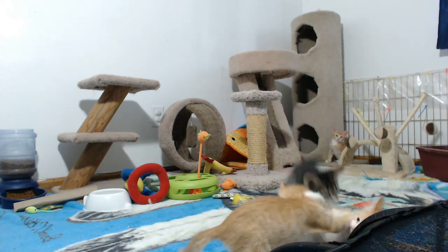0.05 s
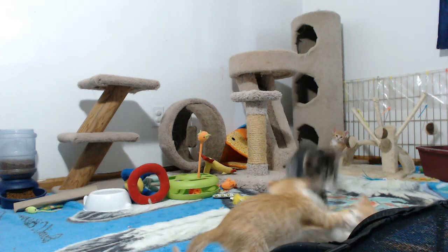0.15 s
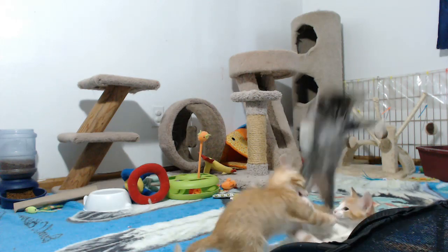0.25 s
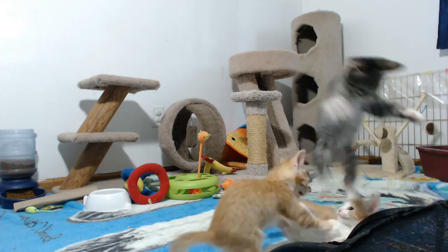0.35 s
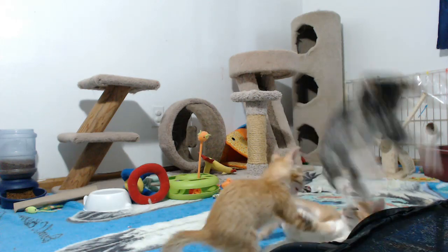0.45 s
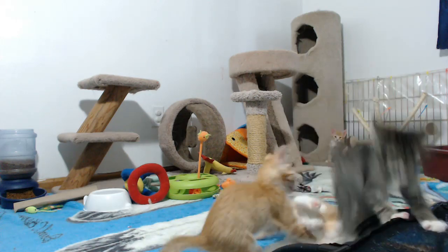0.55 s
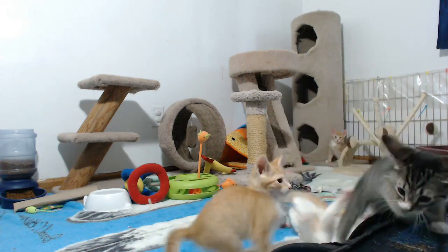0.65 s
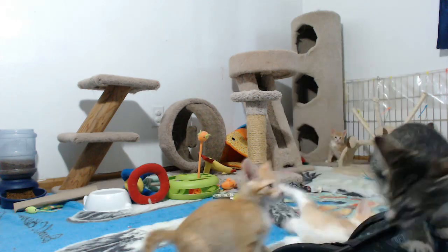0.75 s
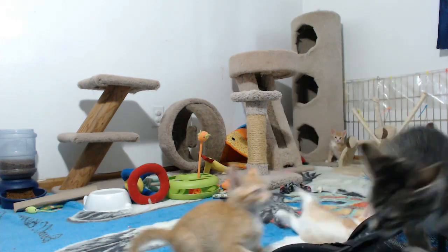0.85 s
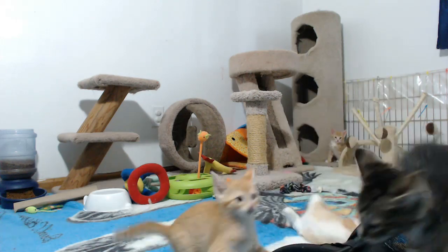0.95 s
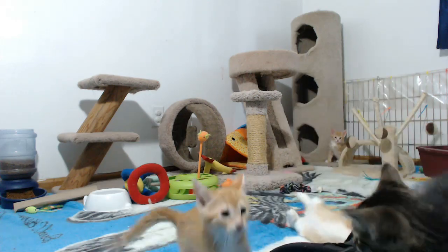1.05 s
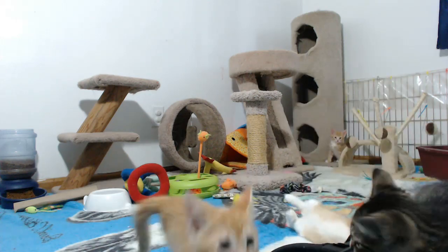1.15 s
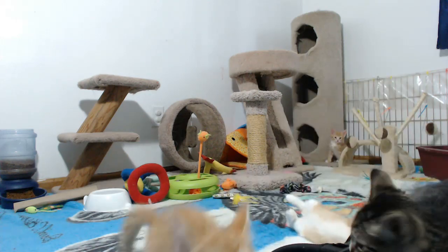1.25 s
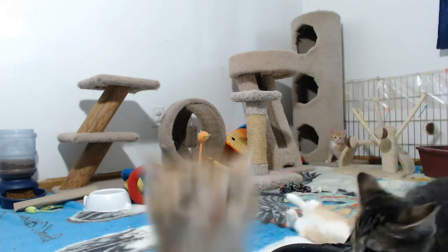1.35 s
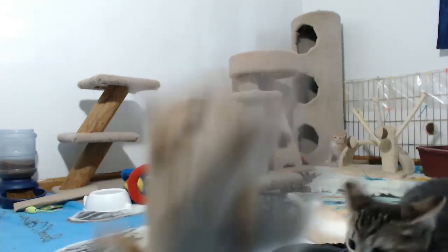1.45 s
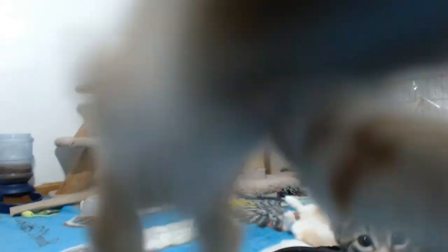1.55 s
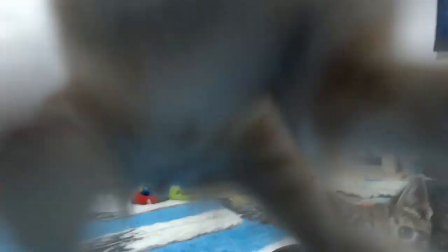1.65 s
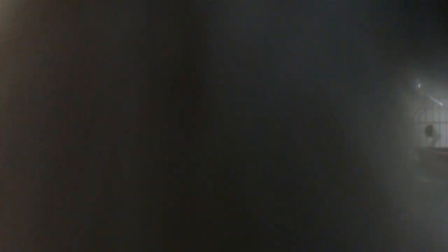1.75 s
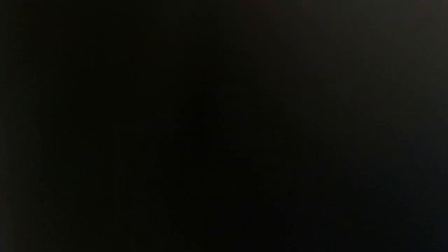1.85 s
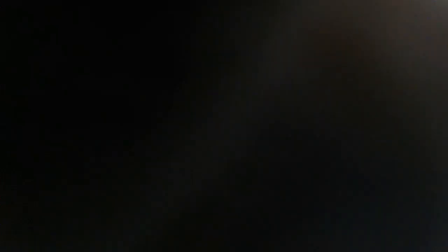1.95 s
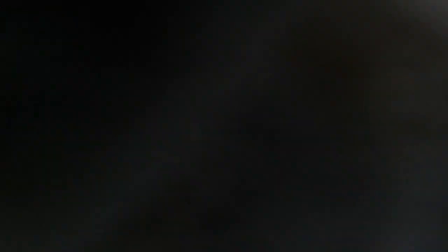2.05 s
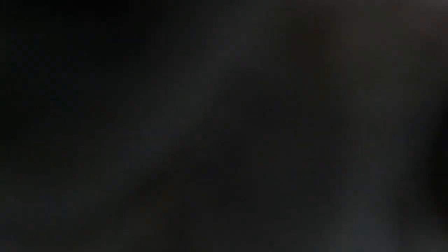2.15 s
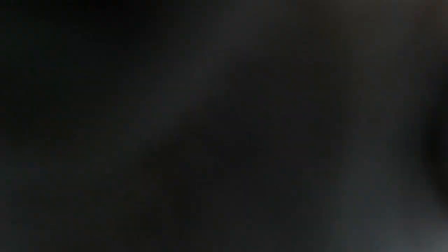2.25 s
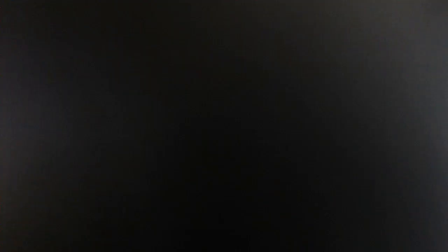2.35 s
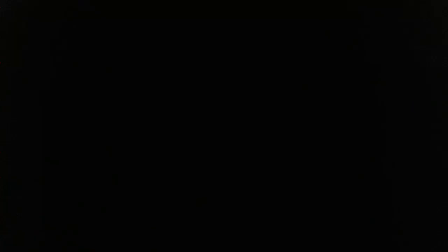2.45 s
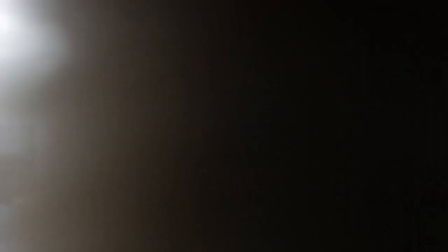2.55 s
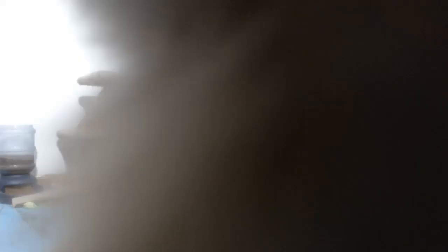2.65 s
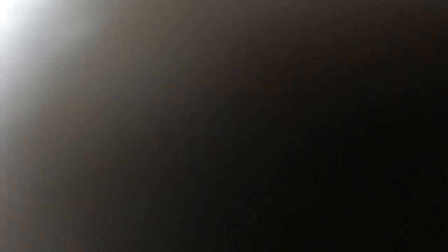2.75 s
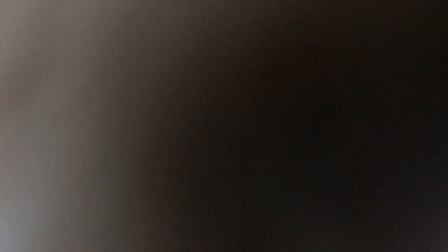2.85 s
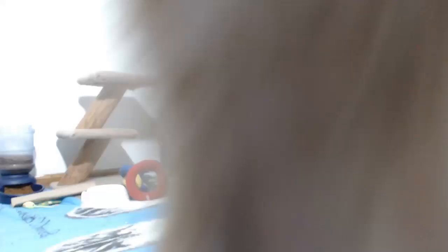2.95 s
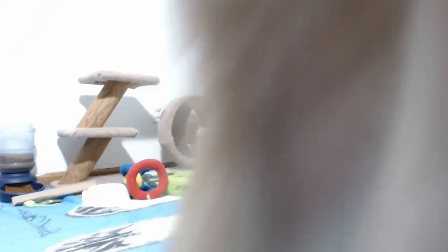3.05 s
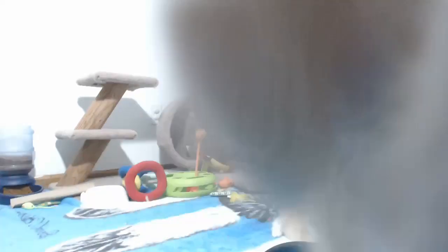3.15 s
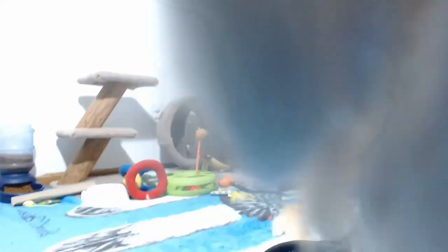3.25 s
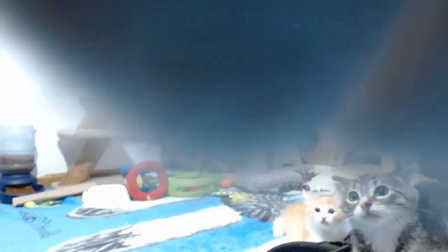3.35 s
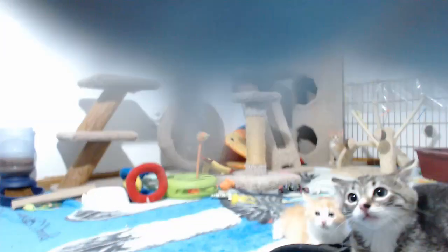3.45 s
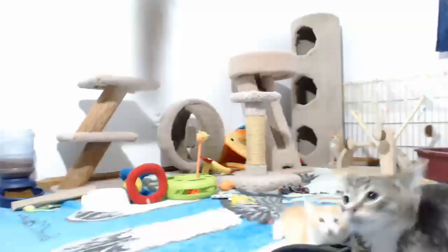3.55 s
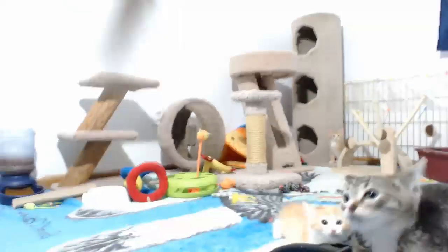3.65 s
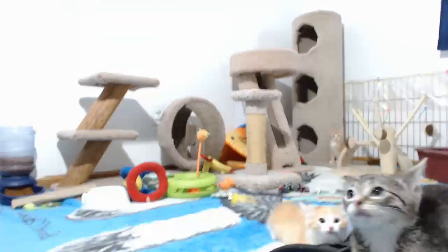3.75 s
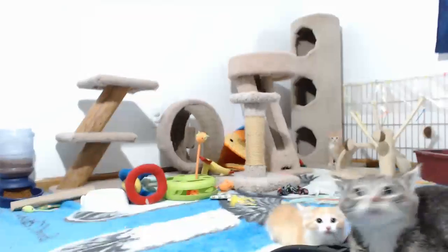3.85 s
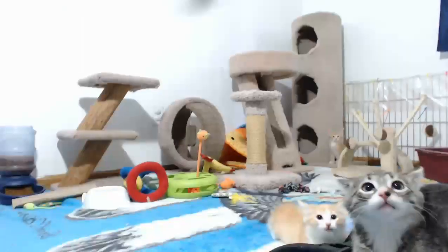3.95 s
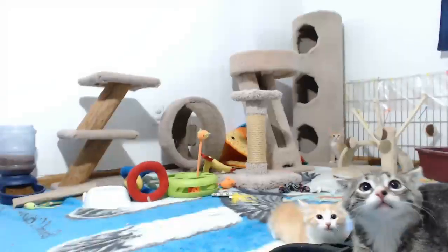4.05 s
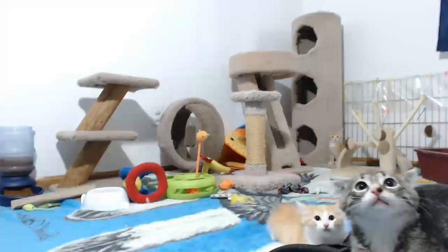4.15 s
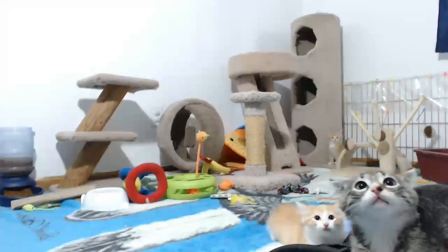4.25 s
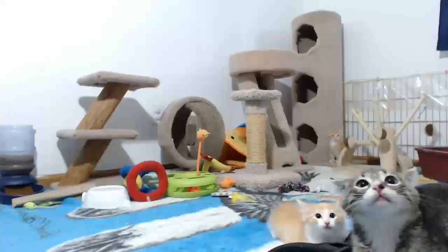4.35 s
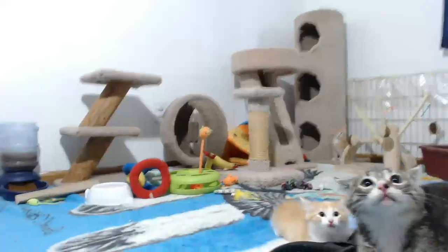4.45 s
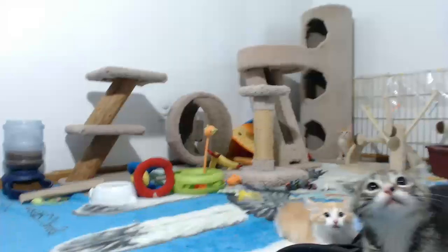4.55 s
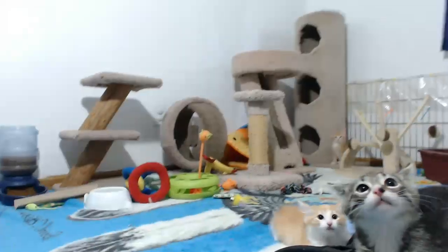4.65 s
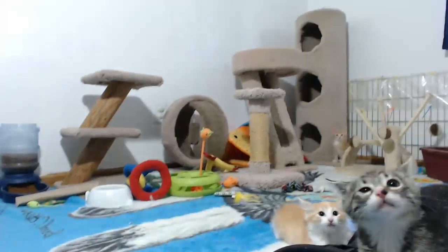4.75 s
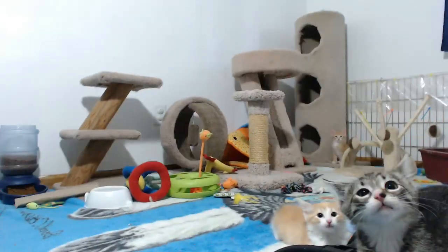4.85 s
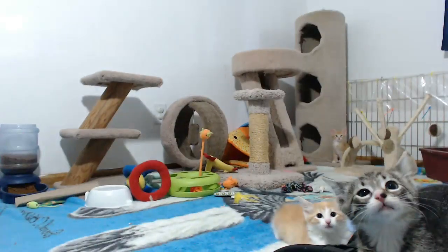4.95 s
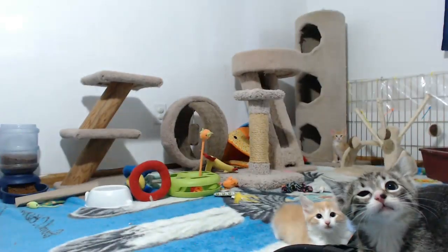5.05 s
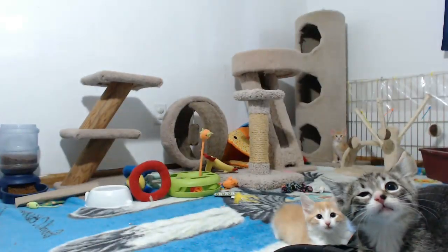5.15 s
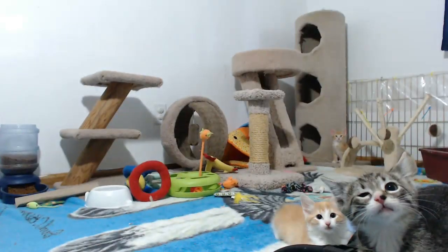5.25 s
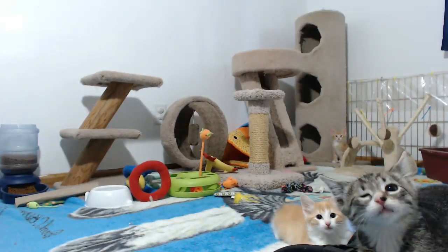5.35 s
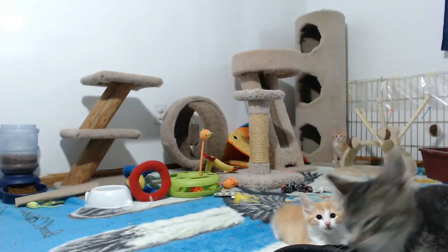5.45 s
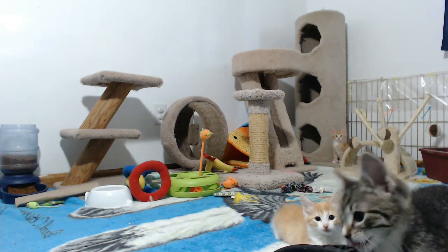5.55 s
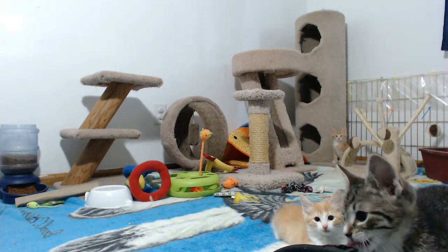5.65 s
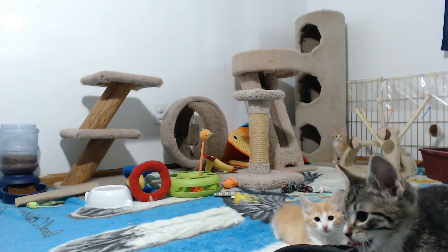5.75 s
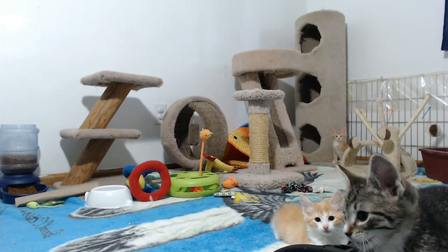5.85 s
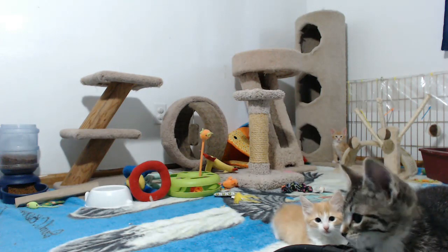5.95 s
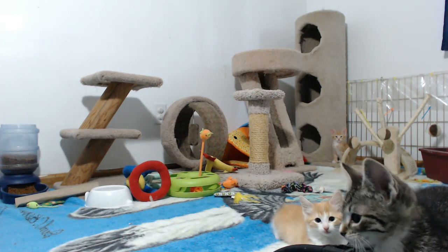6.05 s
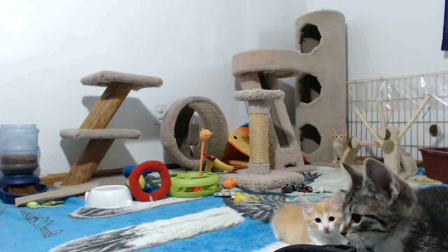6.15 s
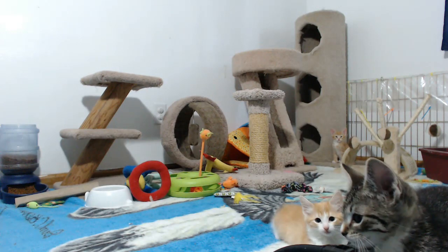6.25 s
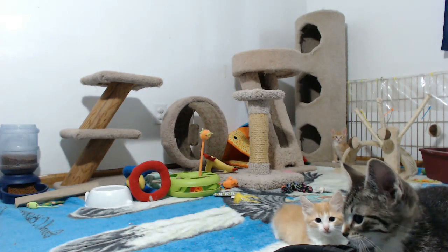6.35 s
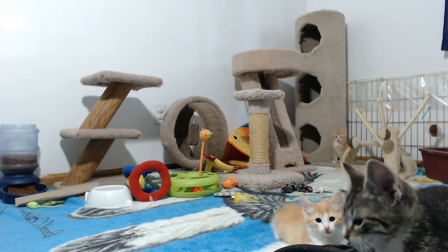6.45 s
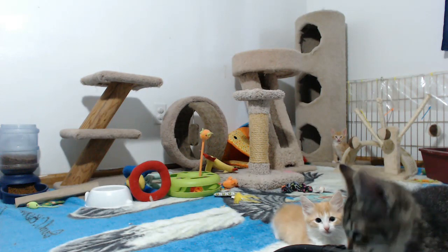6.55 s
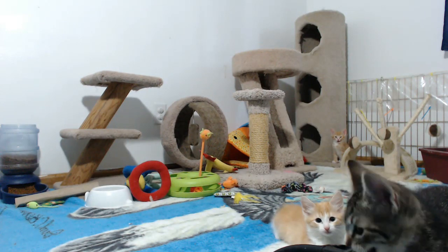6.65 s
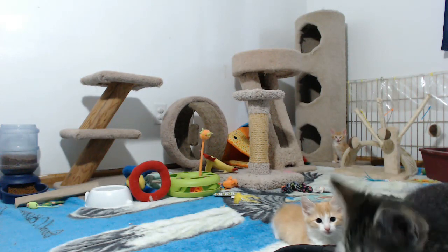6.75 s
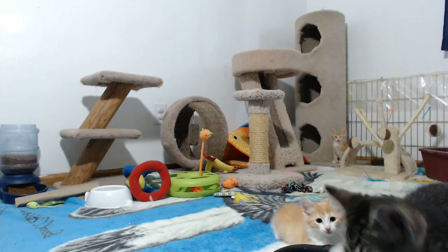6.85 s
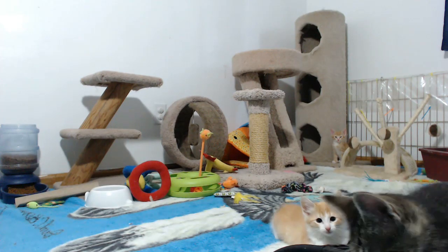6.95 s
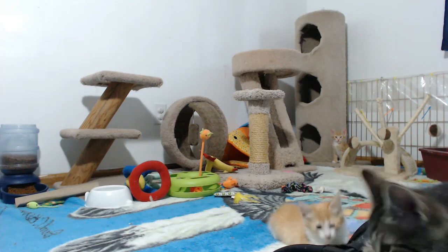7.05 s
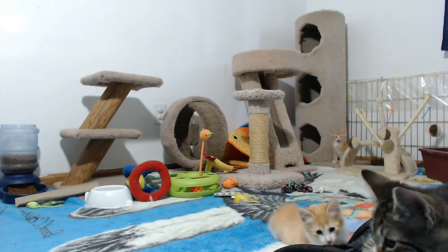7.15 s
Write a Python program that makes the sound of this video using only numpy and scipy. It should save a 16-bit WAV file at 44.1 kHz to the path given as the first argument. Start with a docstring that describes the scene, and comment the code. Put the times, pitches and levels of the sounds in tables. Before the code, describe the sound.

Soft paw scuffles on a mat, then close, overloaded thumps, fur rubbing and claw squeaks on plastic, above a faint throbbing engine hum.

```python
"""Kittens romping around a camera

Kittens romp on a mat in a small room; one climbs over the camera and paws and rubs its plastic housing.
Claws and fur catch and slip beside two microphone ports: random slip forces excite modes of shell and mount.
Paws sound as noise bursts through the mat, shoves as damped sines, and hard blows overload the input.
Underneath, a distant engine hums and throbs as a sum of harmonics over soft, filtered room noise,
with a very faint pulsed whine."""
import sys
import numpy as np
from scipy import signal
from scipy.fft import rfft, irfft
from scipy.io import wavfile
from scipy.ndimage import uniform_filter1d

SR = 44100
rng = np.random.default_rng(int(sys.argv[2]) if len(sys.argv) > 2 else 0)


def store_wav(level_fs):
    """Save 16-bit WAV to argv[1]."""
    pcm = np.round(np.clip(np.atleast_2d(level_fs), -1, 1) * 32767)
    wavfile.write(sys.argv[1], SR, pcm.T.astype(np.int16))


N = 317869
TIME = np.arange(N) / SR  # s


def amp(db):
    """Decibel law: level to amplitude ratio."""
    return 10 ** (np.asarray(db) / 20)


def unit(x):
    """Energy normalisation: scale to rms 1."""
    return x / np.sqrt(np.mean(x ** 2) + 1e-18)


def curves(table):
    """Linear interpolation: the columns of a table of timed rows, sample by sample."""
    s, *columns = np.transpose(table)
    return [np.interp(TIME, s, c) for c in columns]


def add(out, s, x):
    """Superposition: mix x into out from time s on."""
    i = int(s * SR)
    out[..., i:i + x.shape[-1]] += x[..., :N - i]


def excerpt(x, s, length):
    """Windowing: up to length samples of x from time s on."""
    return x[..., int(s * SR):][..., :length]


def cut(x, hz, kind, order=2):
    """Band limiting: a Butterworth filter applied twice."""
    sos = signal.butter(order, hz, kind, fs=SR, output="sos")
    return signal.sosfilt(sos, signal.sosfilt(sos, x))


def through(x, response):
    """Linear systems: convolve x with an impulse response."""
    return signal.oaconvolve(np.atleast_2d(x), np.atleast_2d(response), axes=-1)[:, :N]


def colour(points, size=2048):
    """Minimum phase: the causal impulse response of a spectrum f/Hz, level/dB, by folding its cepstrum."""
    hz, db = np.transpose(points)
    grid = np.maximum(np.fft.rfftfreq(size, 1 / SR), 1)
    level = np.interp(np.log(grid), np.log(hz), db)
    cepstrum = irfft(np.log(amp(level)))
    cepstrum[1:size // 2] *= 2
    cepstrum[size // 2 + 1:] = 0
    return irfft(np.exp(rfft(cepstrum)))


def walk(rate):
    """Slow random fluctuation: normal values, rate per second, joined by straight lines."""
    values = rng.standard_normal(N // 20)
    return np.interp(TIME * rate, np.arange(len(values)), values)


def split(x, low_hz, high_hz):
    """Band division: the dull, middle and sharp registers of x."""
    rest = cut(x, low_hz, "high")
    return cut(x, low_hz, "low"), cut(rest, high_hz, "low"), cut(rest, high_hz, "high")


def registers(response, low_hz, high_hz):
    """Energy normalisation by band: the three registers of a response, each of unit energy."""
    return [part / np.sqrt(np.sum(part ** 2)) for part in split(response, low_hz, high_hz)]


# course of the engine: t/s, firing rate f/Hz, relative level/dB
ENGINE_COURSE = [(0, 113.5, -66.5), (.6, 116, -59), (1.3, 121.7, -63), (2.2, 123.4, -59), (3, 115.2, -59),
                 (3.6, 104.9, -61), (4.5, 101.5, -52), (5, 98.2, -55.5), (5.85, 97.9, -49.5),
                 (6.3, 94.3, -54), (6.8, 90.8, -58), (7.2, 88.26, -60.5)]
# its spectral lines: multiple of the cycle rate, relative level/dB
ENGINE_LINES = [(4, -17), (5, 0), (7, -12), (8, 4), (9, -1.5), (10, -12), (11, -12), (17, -18)]


def engine(hum_db=0, room_hz=106, room_width_hz=26, waver_db=1.5):
    """Harmonic synthesis and beats: a room resonance lifts neighbouring lines, which beat at the cycle rate."""
    firing_hz, db = curves(ENGINE_COURSE)
    cycle_hz = firing_hz / 8  # it fires eight times a cycle
    phase = 2 * np.pi * np.cumsum(cycle_hz) / SR

    def lift(hz):
        """Resonance: a bell of gain over a small floor."""
        return .2 + 1 / (1 + ((hz - room_hz) / (room_width_hz / 2)) ** 2)

    lines = 0
    for multiple, line_db in ENGINE_LINES:
        k = round(multiple)
        strength = amp(line_db + waver_db * walk(6.9)) * lift(k * cycle_hz)
        lines = lines + strength * np.sin(k * phase + 2 * np.pi * rng.random())
    return np.sqrt(2) * lines / lift(firing_hz) * amp(db + hum_db)


# spectral density of the room noise: f/Hz, relative level per Hz/dB
AIR_SPECTRUM = [(100, -12), (170, -17.5), (252, -20), (450, -17.5), (750, -16), (900, -21), (1500, -28.5),
                (2310, -34.5), (4600, -44), (7000, -48.5), (15000, -54.5)]
AIR_DB = -70  # reference level of the hiss: mean of both ports, above 100 Hz


def air(shared_hz=1300, rumble_db=-64):
    """Spatial coherence: room noise is alike at both ports in the bass and unrelated in the hiss."""
    noise = rng.standard_normal((4, N))
    shared = cut(noise[0], shared_hz, "low", order=1)
    separate = cut(noise[1:3], shared_hz, "high", order=1)
    hiss = through(shared + separate, colour(AIR_SPECTRUM))
    hiss = hiss * amp(AIR_DB) / np.std(cut(hiss.mean(axis=0), 100, "high"))
    rumble = cut(cut(noise[3], 150, "low"), 25, "high", order=1)
    return hiss + unit(rumble) * amp(rumble_db)


WHINE_DOUBLES_S = 4.9  # the whine gains its higher pitch from this time on


def whine(low_hz=5500, high_hz=8000, db=-95, pulse_hz=15):
    """Gated tones: a very faint electronic whine switches on and off; later a higher pitch fills its gaps."""
    gate = uniform_filter1d(1.0 * (np.sin(2 * np.pi * pulse_hz * TIME) > 0), size=200)
    gaps = (1 - gate) * (TIME > WHINE_DOUBLES_S)
    return amp(db) * (gate * np.sin(2 * np.pi * low_hz * TIME) + gaps * np.sin(2 * np.pi * high_hz * TIME))


# kittens landing and scuffling on the mat: t/s, relative level/dB, softness/dB, decay time t/s
PAWFALLS = [(0.49, -56.5, 9, 0.011), (.499, -51, -6, 0.0027), (0.526, -53.5, 3.5, .014),
            (0.662, -66, -8, .004), (.785, -62, 7, 0.0026), (0.792, -57.5, 5.5, 0.0064),
            (0.943, -72.5, -5, 0.033), (1.181, -55, -2.5, 0.0017), (1.197, -72.5, -6, .025),
            (5.047, -70, 10, 0.0022), (5.477, -66, 3, 0.0057), (5.688, -64, 5, 0.0031),
            (6.53, -63.5, 6.5, .004), (6.73, -71.5, 7, .05), (6.92, -72.5, 1, 0.059), (7.032, -72, 2, .03)]


def steps(step_db=0, thump_db=4, scratch_db=-10, thump_linger_s=.005):
    """Impact spectrum: thump, scuff and scratch; the softer the paw, the more thump and the less scratch."""
    force, t = np.zeros((3, N)), TIME[:SR // 5]
    for s, db, softness, length in PAWFALLS:
        fades = np.exp(-t / (length + np.array([[thump_linger_s], [0], [0]])))
        shares = np.array([[thump_db + softness], [0], [scratch_db - softness]])
        add(force, s, amp(step_db + db + shares) * fades * rng.standard_normal(len(t)))
    # response of the mat: f/Hz, relative level/dB
    mat = colour([(20, -32), (140, 15.5), (400, -11), (1400, -26), (2100, -28.5), (3000, -31.5),
                  (5000, -32.0), (13000, -50)])
    return sum(through(push, response) for push, response in zip(force, registers(mat, 470, 2100)))


# reverberation time of the room in its bass, middle and treble: t/s
ROOM_T60 = (.13, .48, .36)


def room(x, low_db=-13, mid_db=-8, high_db=-11):
    """Reverberation: bare walls give a diffuse tail that builds within milliseconds and lasts longest mid-band."""
    t = TIME[:SR * 3 // 4]
    noise = cut(rng.standard_normal((2, len(t))), 6800, "low", order=1)
    tail = 0
    for band, t60, db in zip(split(noise, 700, 2400), ROOM_T60, (low_db, mid_db, high_db)):
        decay = np.exp(-np.log(1000) * t / t60) * (1 - np.exp(-t / 0.005))
        tail = tail + amp(db) * band * decay / np.sqrt(np.sum(decay ** 2))
    return through(x.mean(axis=0), tail)


# shoves that rock the camera: t/s, relative level/dB, f/Hz
SHOVES = [(1.311, -34, 126), (1.512, -8, 264), (1.679, -13.5, 67.6), (1.744, -13, 291), (1.778, -23, 41.2),
          (2.092, -31.5, 92.5), (2.339, -19, 93), (2.413, -28.5, 117), (2.584, -25.5, 97),
          (2.783, -31.5, 54.7), (2.925, -1.5, 560), (3.03, -19.5, 69), (3.393, -35, 95), (3.56, -12, 601),
          (4.399, -14, 127), (4.403, -0.5, 504), (4.744, -23, 290), (4.859, -20.5, 197)]


def thuds(thud_db=-1, cycles=0.63, rumble_db=-7, left_db=1, port_phase=0.23):
    """Damped oscillation: a shoved camera rocks for a cycle or two; the ports move out of step (phase in rad)."""
    out, t = np.zeros((2, N)), TIME[:SR // 6]
    buffet = unit(cut(cut(rng.standard_normal((2, N)), 180, "low"), 6.7, "high", order=1))
    for s, db, hz in SHOVES:
        fade = np.exp(-t * hz / cycles) * (1 - np.exp(-t / 0.00087))
        rock = np.sin(2 * np.pi * hz * t + np.array([[port_phase], [-port_phase]]))
        add(out, s, amp(db + thud_db) * fade * (rock + amp(rumble_db) * excerpt(buffet, s, len(t))))
    return cut(out, 30, "high", order=1) * amp([[left_db], [-left_db]])


# claws and paws striking the housing, for brushes() and knocks():
# t/s, relative level/dB, softness/dB (pad above 0, claw below), nominal skid time t/s
BLOWS = [(1.508, -34.5, 0.5, .008), (1.5135, -21.5, 5, 0.026), (1.559, -29, -9.5, 0.039),
         (1.58, -27, 1.5, 0.024), (1.671, -33.5, -2.5, 0.028), (1.695, -22, 5.5, 0.037),
         (1.75, -22.5, 7.5, 0.05), (1.8453, -21, 3.5, 0.006), (1.867, -25.5, -9, 0.0014),
         (1.92, -35.5, -7, 0.03), (2.331, -36.5, -16.5, 0.0044), (2.351, -24, -2.5, 0.016),
         (2.434, -29, -4, 0.022), (2.481, -27.5, -2.5, 0.0026), (2.55, -47, -0.5, 0.028),
         (2.596, -33, -3, 0.016), (2.664, -32, 7, 0.0034), (2.685, -39.5, -1, 0.011), (2.739, -41, 0, .01),
         (2.775, -42.5, 2.5, 0.018), (2.926, -22, 5, 0.01), (2.937, -26.5, -5, 0.022),
         (3.1, -40.5, 1, 0.011), (3.234, -45, 6, 0.018), (3.31, -42.5, 0.5, 0.0069), (3.329, -37, 6, .008),
         (3.4185, -25, 1.5, 0.016), (3.534, -24.5, 2, 0.013), (3.556, -21, 3.5, 0.041),
         (4.167, -40, 2, 0.0031), (4.188, -34.5, -5, 0.019), (4.297, -40.5, -0.5, 0.011),
         (4.384, -44.5, -3.5, 0.04), (4.398, -19.5, 3, 0.011), (4.413, -25.5, -2.5, 0.025),
         (4.5255, -39.5, -7, 0.041), (4.595, -47.5, -24, 0.041), (4.804, -51, 8, 0.013),
         (4.845, -48, -2.5, 0.033), (4.931, -49, -15.5, 0.022)]


def brushes(brush_db=-16, lead_s=0.0035, edge_db=-9):
    """Grazing friction: noise swells exponentially as the fur of a paw brushes the housing before each blow."""
    graze, t = np.zeros(N), TIME[:SR // 20]
    for s, db, _, _ in BLOWS:
        add(graze, s - t[-1], amp(db + brush_db) * np.exp((t - t[-1]) / lead_s))
    return amp([[[0]], [[0]], [[edge_db]]]) * graze * rng.standard_normal((2, N))


# the kitten is on the camera between the first two times; it slides off over the third
LEANS_S, LEAVES_S, EASE_OFF_S = 1.5, 5.15, 0.29


def touch():
    """Contact envelope, 0-1: the kitten leans in at once and slides off gently."""
    return np.clip((TIME - LEANS_S) / .015, 0, 1) * np.clip((LEAVES_S - TIME) / EASE_OFF_S, 0, 1)


RESTING_DB = -61  # pressure of the light touch between strokes
# strokes of fur over the housing:
# t/s of firmest pressure, pressure level/dB, softness/dB, swell time t/s, release time t/s
FUR_STROKES = [(1.595, -32, 3, .025, 0.015), (1.65, -45.5, 9.5, .03, 0.047), (1.769, -33, -1.5, .04, 0.1),
               (1.95, -45.5, -3.5, 0.055, 0.13), (2.109, -45.5, -4.5, 0.049, 0.11),
               (2.388, -37, 3, .04, 0.07), (2.658, -47, -0.5, .06, .09), (2.96, -44.5, 1, 0.027, 0.11),
               (3.125, -51, 0, .015, 0.029), (3.24, -47, -2, .018, 0.028), (3.45, -46, -0.5, .09, 0.08),
               (3.59, -35.5, -3.5, .015, 0.079), (3.69, -38.5, 5.5, 0.016, 0.037),
               (4.24, -46.5, -5, .035, 0.061), (4.471, -42.5, 4, .02, 0.031), (4.645, -40.5, 1, .03, 0.062)]


def contact():
    """Power addition: pressure and softness of the fur in dB, strokes swelling over a light resting touch."""
    power, soft = amp(RESTING_DB) ** 2, 0
    for s, db, softness, swell, release in FUR_STROKES:
        away = np.maximum((s - TIME) / swell, (TIME - s) / release)
        stroke = (amp(db) * np.exp(-away)) ** 2
        power, soft = power + stroke, soft + stroke * softness
    return 10 * np.log10(power), soft / power


FIRM_DB = -36  # pressure of a firm stroke
WEIGHT_DB, WEIGHT_SLOPE = -37, 0.61  # dull weight at that pressure, before softness; dB gained per dB of pressure
HISS_DB, HISS_SLOPE = -40, 1.3  # the same for the bristle hiss


def weight_of(pressure, softness):
    """Compressive power law: dull weight on the housing in dB grows more slowly than the pressure."""
    return WEIGHT_DB + WEIGHT_SLOPE * (pressure - FIRM_DB) + softness


def slips(per_s, spread_db):
    """Stick-slip: unequal random clicks; each port feels the same slips with its own strength and sign."""
    clicks = rng.random(N) < per_s / SR
    sizes = clicks * amp(spread_db * np.minimum(rng.exponential(size=N), 4))
    return unit(sizes * rng.standard_normal((2, N)))


def rubbing(body_db=-1, patchy_db=3, grip_db=-57, bristle_db=2, hiss_per_softness=.9, edge_echo=0.49,
            lag_s=.0005, slide_s=.00018):
    """Dry friction, by register: a light touch swishes, a firm one catches and slips in uneven patches."""
    pressure, softness = contact()
    hiss = HISS_DB + HISS_SLOPE * (pressure - FIRM_DB) - hiss_per_softness * softness + bristle_db * walk(45)
    grip = 1 / (1 + amp(grip_db - pressure))
    crackle = slips(per_s=2700, spread_db=-0.5) * amp(patchy_db * walk(110))
    drag = np.sqrt(grip) * crackle + (1 - grip) * rng.standard_normal((2, N))
    # the point of contact slides, so the echo from the shell's edge keeps changing its colour
    echo_time = TIME - lag_s - slide_s * walk(9)
    earlier = np.clip(np.round(echo_time * SR), 0, N - 1).astype(int)
    drag = (drag + edge_echo * drag[:, earlier]) / np.hypot(1, edge_echo)
    levels = amp([weight_of(pressure, softness), pressure + body_db, hiss])
    return levels[:, None] * drag * touch()


def snags(per_s=40, snag_db=4, spread_db=3, skid_s=0.0018, weight_db=-4, edge_db=0, catch_db=-54):
    """Random impulses: hairs and claw tips snag while fur drags, more often and harder under more pressure."""
    pressure, _ = contact()
    rate = per_s / (1 + amp(catch_db - pressure) ** 2)
    starts = (rng.random(N) < rate / SR) * amp(spread_db * np.clip(rng.standard_normal(N), -2, 2))
    fades = through(starts, np.exp(-TIME[:SR // 20] / skid_s))
    levels = amp([[[weight_db]], [[0]], [[edge_db]]]) * amp(pressure + snag_db)
    return levels * touch() * fades * rng.standard_normal((2, N))


def fur_rumble(rumble_db=-1, top_hz=140, uneven_db=3):
    """Volume displacement: fur pressing on the ports pumps air in and out of them in uneven nudges."""
    pumped = cut(cut(rng.standard_normal((2, N)), top_hz, "low", order=1), 16, "high", order=1)
    return unit(pumped) * amp(weight_of(*contact()) + rumble_db + uneven_db * walk(25)) * touch()


def knocks(knock_db=1, weight_db=0, edge_db=-5, edge_per_softness=0.29, weight_lasts=0.87, edge_lasts=0.8,
           edge_echo=0.62):
    """Impact and skid, by register: dying runs of slips; soft pads give more weight and less edge."""
    force, grit = np.zeros((3, 2, N)), slips(per_s=5000, spread_db=1)
    t = TIME[:SR // 6]
    # an echo from the shell's edge, lagging by some samples, colours each point of contact differently
    lags = rng.integers(4, 36, len(BLOWS))
    for (s, db, softness, skid), lag in zip(BLOWS, lags):
        shares = (weight_db + softness, 0, edge_db - edge_per_softness * softness)
        for register, share_db, lasts in zip(force, shares, (weight_lasts, 1, edge_lasts)):
            fade = np.exp(-t / max(skid * lasts, .0005))
            run = excerpt(grit, s, len(t)) * fade
            run = unit(run + edge_echo * np.roll(run, lag, axis=1)) * np.sqrt(np.mean(fade ** 2))
            add(register, s, amp(knock_db + db + share_db) * run)
    return force


# the kitten's weight damps the shell and the mount until it lets go, for damped() and mount():
# t/s, freedom to ring as level/dB
RINGING_FREEDOM = [(1.5, -11.5), (2.6, -6), (3.5, -6.5), (4.1, -5.5), (4.38, 1), (5, 3.5)]


def damped(force, per_freedom=0.16, middle_db=2):
    """Damping by load: the kitten's weight takes force out of the middle register, where the plastic rings."""
    dull, middle, sharp = force
    return np.array([dull, middle * amp(middle_db + per_freedom * curves(RINGING_FREEDOM)[0]), sharp])


# resonances of the shell: f/Hz, bandwidth f/Hz, relative level/dB at the left port, the same at the right
SHELL_MODES = [(560, 120, -2, -3.5), (980, 220, -5.5, 4), (1500, 230, 10, -9), (1504, 480, 0.5, -7.5),
               (1762, 220, -4.5, 5.5), (3046, 67, -30, -11.5), (3610, 500, -5, -33),
               (4320, 100, -0.5, -14.5), (4320, 600, -15.5, -22), (11570, 300, -12.5, -37)]
# contact noise right at a port: f/Hz, relative level/dB
PORT_SPECTRUM = [(60, 12), (200, -4), (500, 1.5), (900, 7), (1400, -2.5), (2200, 2.5), (2700, -5.5),
                 (4800, -3.5), (5800, -16), (8000, -20.5), (10000, -22.5), (12500, -16.5), (15000, -49)]


def housing(force, direct_db=-1, shell_db=0, left_db=(.8, .8, 2)):
    """Modal superposition: each port hears the contact beside it, and both hear resonances of the shell."""
    direct = colour(PORT_SPECTRUM)
    t = TIME[:len(direct)]
    shell = 0
    for k, (hz, width, left, right) in enumerate(SHELL_MODES):
        decay = 2 * np.pi * width / SR * np.exp(-np.pi * width * t)
        mode = (-1) ** k * decay * np.sin(2 * np.pi * hz * t)
        # the lowest mode rocks the shell, so it pushes one port and pulls the other
        right_sign = 1 if k else -1
        shell = shell + np.outer([amp(left), amp(right) * right_sign], mode)
    whole = np.vstack([direct * amp(direct_db), shell * amp(shell_db)])
    out = 0
    for push, response, lean in zip(force, registers(whole, 670, 2500), left_db):
        beside = through(push, response[0]) * amp([[lean], [-lean]])
        out = out + beside + through(push[0], response[1:])
    return cut(out, 85, "high", order=1)


# long rings of the mount: f/Hz, relative level/dB, reverberation time t60/s
MOUNT_MODES = [(1014, -2, 0.7), (1114, 1.5, 0.59), (1250, 1, 0.66), (1393, 6, 0.43), (1382, -3, 1),
               (1337, 2, 0.86), (1595, -4, 1), (1622, 2, 0.38), (1750, 1, 0.1483)]


def mount(shake, ring_db=-61, right_db=-3):
    """Free vibration: the shaken mount sings on, the more the less weight rests on it."""
    t = TIME[:SR]
    ring = 0
    for hz, db, t60 in MOUNT_MODES:
        ring = ring + amp(db) * np.exp(-np.log(1000) * t / t60) * np.sin(2 * np.pi * hz * t)
    drive = shake.mean(axis=0) * amp(curves(RINGING_FREEDOM)[0])
    return through(drive, ring * amp(ring_db)) * amp([[0], [right_db]])


# claws squeaking on plastic: t/s, length t/s, f/Hz, level/dB (peak rms at the left port)
CLAW_SQUEAKS = [(3.575, 0.057, 4260, -34.5), (4.589, 0.014, 3190, -41.5), (4.605, 0.078, 4440, -36.5),
                (4.84, 0.037, 4290, -45.5)]


def squeaks(waver=0.016, right_db=-7):
    """Periodic stick-slip: a claw slips regularly for a moment and whistles, its pitch wavering."""
    out, wobble = np.zeros(N), walk(1000)
    for s, length, hz, db in CLAW_SQUEAKS:
        n = int(length * SR)
        phase = 2 * np.pi * np.cumsum(hz * (1 + waver * excerpt(wobble, s, n))) / SR
        add(out, s, amp(db) * np.sqrt(2) * np.hanning(n) * np.sin(phase))
    return out * amp([[0], [right_db]])


def scene(far_left_db=1, steps_room_db=8):
    """Superposition: the kitten on the camera, the others on the mat, and the room around them."""
    paws = steps()
    far = (paws + engine() + air()) * amp([[far_left_db], [-far_left_db]])
    force = brushes() + knocks() + rubbing() + snags()
    shake = housing(damped(force)) + squeaks()
    echoes = room(shake + paws * amp(steps_room_db))
    return shake + mount(shake) + thuds() + fur_rumble() + echoes + far + whine()


def record(dry, ceiling=.25, top_hz=15300):
    """Saturation and band limiting: each channel squashes the hardest blows; the top is cut."""
    squashed = dry / (1 + (dry / ceiling) ** 6) ** (1 / 6)
    return signal.sosfilt(signal.ellip(8, .2, 70, top_hz, fs=SR, output="sos"), squashed)


dry = scene()
out = record(dry)
store_wav(out)
```